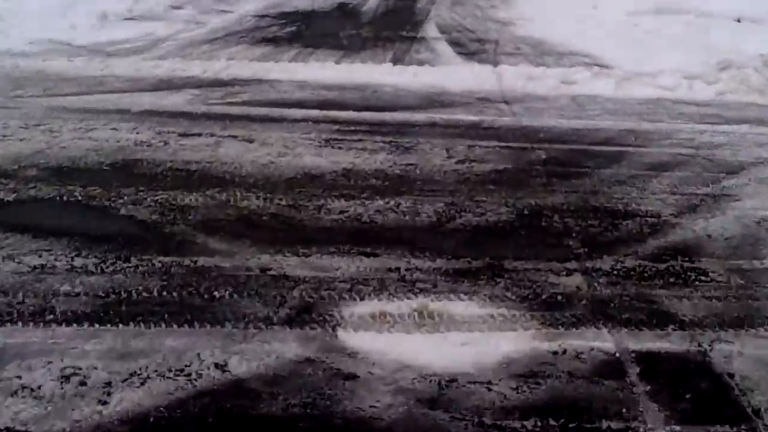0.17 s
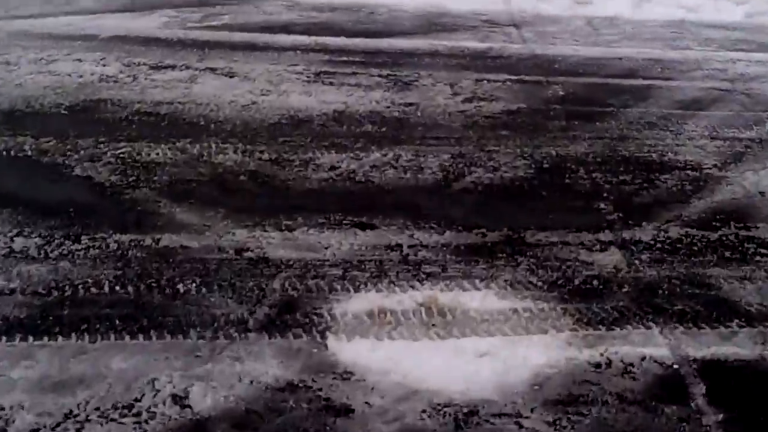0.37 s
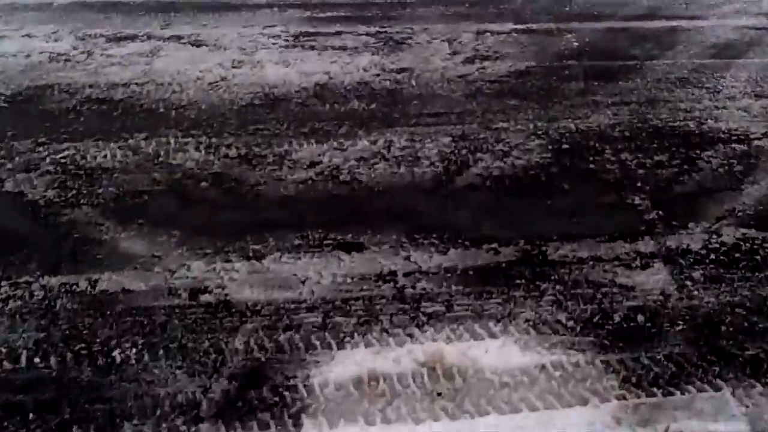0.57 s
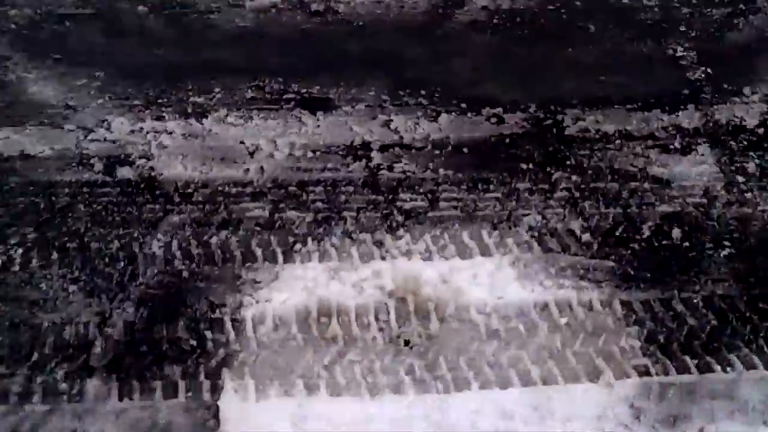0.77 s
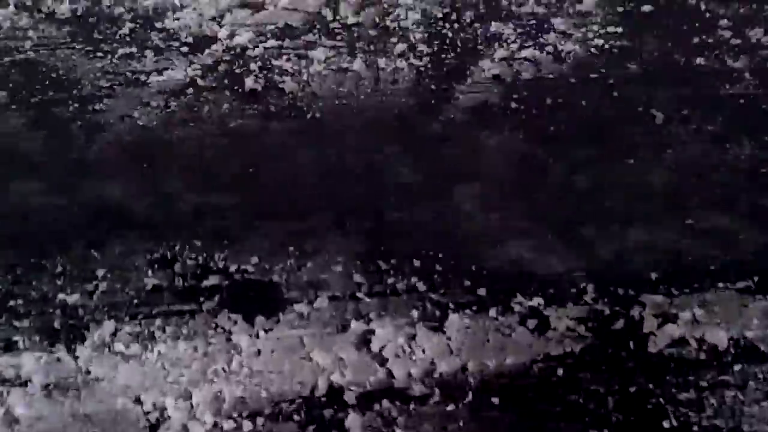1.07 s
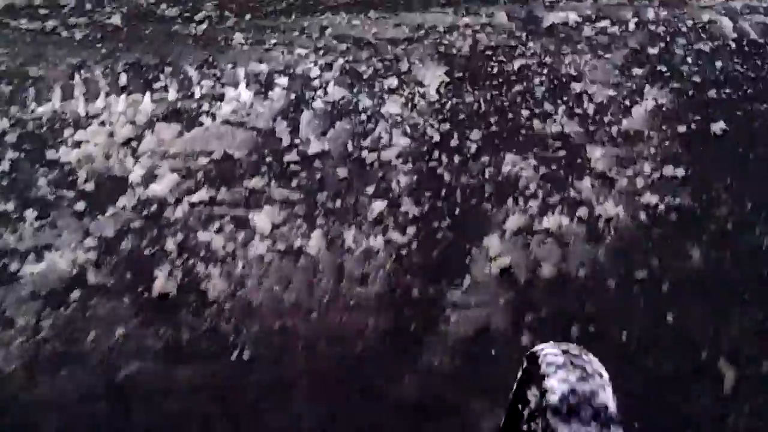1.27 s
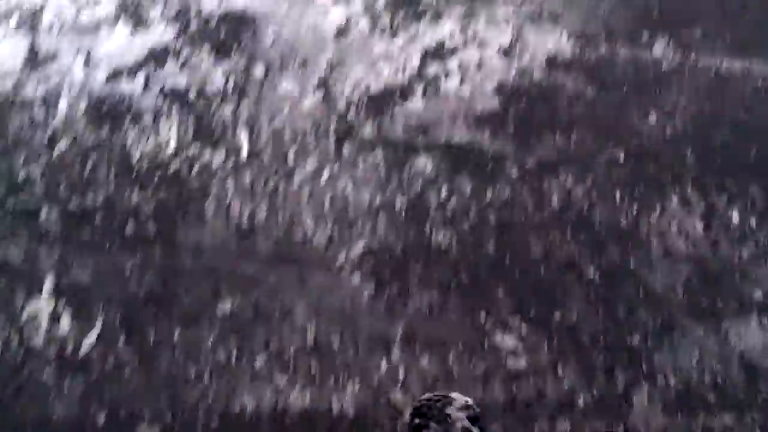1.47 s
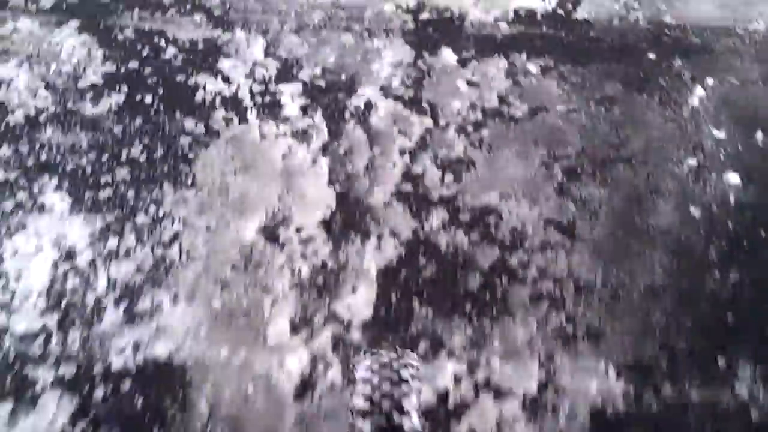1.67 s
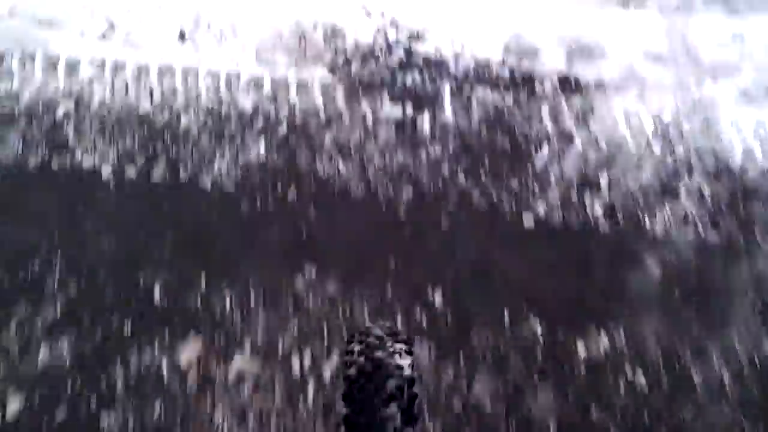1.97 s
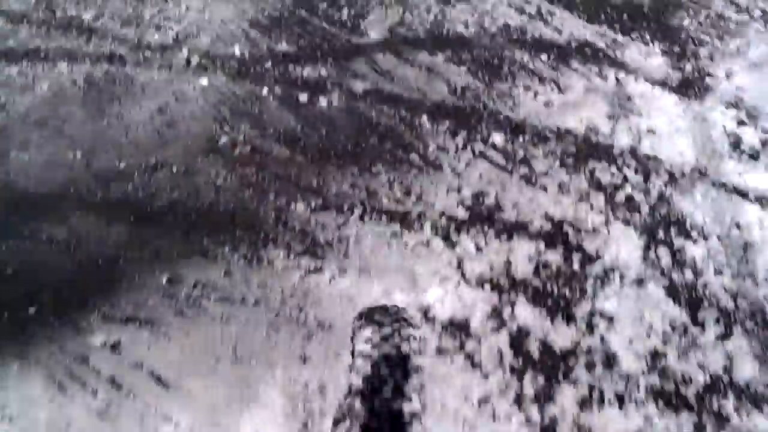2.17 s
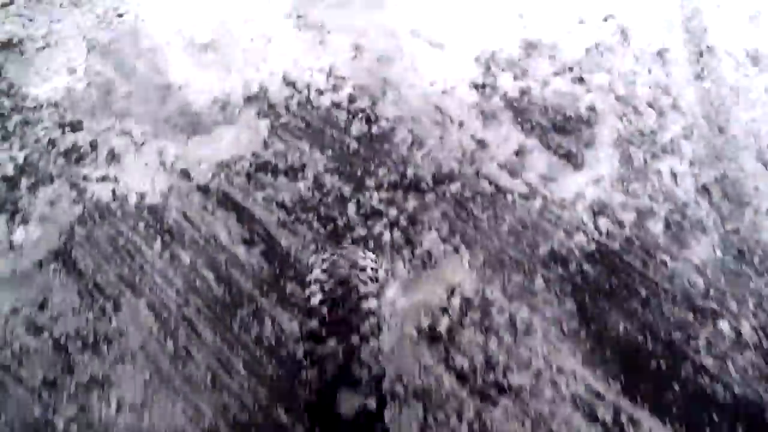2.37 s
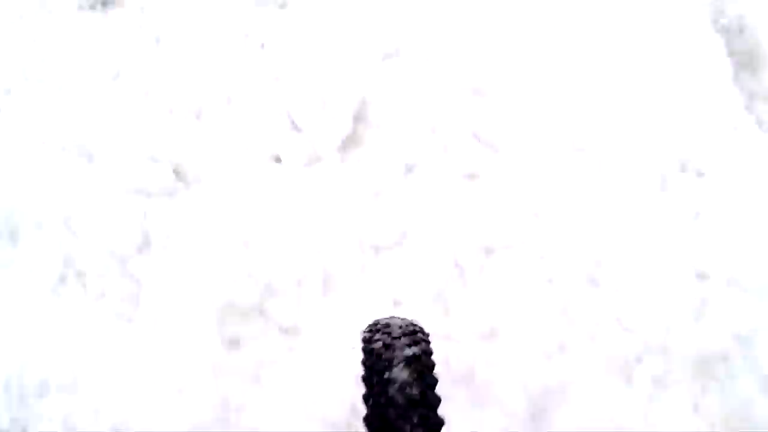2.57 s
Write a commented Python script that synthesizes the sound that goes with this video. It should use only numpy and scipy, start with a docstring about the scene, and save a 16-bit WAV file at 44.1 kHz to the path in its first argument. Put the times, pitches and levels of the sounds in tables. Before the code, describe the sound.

Continuous crunching of a bicycle tyre on ice and soft snow, close up, while wind rumbles on the microphone. Crisp cracks, dull bumps and small wet spits come first, then a low tread hum and a louder cluster of icy snaps.

```python
"""First comes a low rumble of wind and the crunch of ice under a knobbly bicycle tyre, heard from
the handlebar. Wind buffets the microphone while the tread breaks ice grains, squashes soft snow
and crushes dry powder over a faint wet-road hiss. Crust snaps, frozen lumps crumble, soft clods
give way, ruts bump the wheel and wet patches spit. Later the tread hums louder on bare road,
and a flurry of snaps ends the ride."""
import sys
import numpy as np
from scipy import signal
from scipy.fft import rfft, irfft
from scipy.io import wavfile

SR = 44100
rng = np.random.default_rng(int(sys.argv[2]) if len(sys.argv) > 2 else 0)


def wav_record(signal):
    """Record a signal, one row per channel, as 16-bit PCM in the file named by sys.argv[1]."""
    frames = np.transpose(np.atleast_2d(signal))
    bounded = np.clip(frames, -1, 1)
    # unit amplitude maps onto the largest positive 16-bit level
    quanta = np.round(bounded * 32767).astype(np.int16)
    wavfile.write(sys.argv[1], SR, quanta)


N = 119511  # samples: about 2.7 seconds


def amp(db):
    """Turns decibels into a number to multiply a sound by."""
    return 10 ** (np.asarray(db) / 20)


def unit(x):
    """Scales a sound so its average strength (rms) is 1."""
    return x / np.sqrt(np.mean(x ** 2) + 1e-20)


def level(points):
    """A volume curve that joins (time_s, level_db) points."""
    return amp(np.interp(np.arange(N) / SR, *np.transpose(points)))


def swells(rows):
    """A volume curve with one smooth hill per (middle_s, length_s, level_db) row."""
    t = np.arange(N) / SR
    power = sum(amp(db) ** 2 * np.exp(-np.pi * ((t - s) / length) ** 2) for s, length, db in rows)
    return np.sqrt(power + 1e-20)


def add(mix, start_s, sound):
    """Mixes a sound in at a given time."""
    part = mix[max(round(start_s * SR), 0):][:len(sound)]
    part += sound[:len(part)]


def ping(tone, stretch=1, sharpness=1, size=4096):
    """A click with a given tone. Stretch scales its pitch; sharpness 1 starts at once, 0 fades in."""
    pitch_hz, level_db = np.transpose(tone)
    hz = abs(np.fft.fftfreq(size, 1 / SR))
    log_gain = np.log(amp(np.interp(np.log(hz + 1), np.log(pitch_hz * stretch), level_db)))
    phase = -min(sharpness, 1) * signal.hilbert(log_gain).imag
    return np.fft.ifft(np.exp(log_gain + 1j * phase)).real


def through(x, pulse):
    """Gives a sound the tone of a pulse."""
    return signal.fftconvolve(x, pulse)[:N]


def drift(hz):
    """A smooth random wobble, up to about hz times a second."""
    keep_slow = np.exp(-(np.fft.rfftfreq(N, 1 / SR) / hz) ** 2)
    return unit(irfft(rfft(rng.standard_normal(N)) * keep_slow, N))


def grains(per_s, spread_db):
    """Random clicks. A positive spread makes a few louder, a negative one a few quieter."""
    size = amp(spread_db * np.minimum(rng.exponential(1, N), 4.5))
    return unit(size * rng.choice([-1, 1], N) * (rng.random(N) < per_s / SR))


def scatter(x, echo_db=-10.5, rise_s=.0014, fade_s=.018):
    """Adds a short blur of echoes from the tyre, frame and road."""
    t = np.arange(4096) / SR
    tail = rng.standard_normal(len(t)) * amp(-60 * t / fade_s) * (1 - np.exp(-t / rise_s))
    return x + amp(echo_db) * signal.fftconvolve(x, tail / np.linalg.norm(tail))[:len(x)]


# The wind's tone (how strong each pitch is next to the others): pitch_hz, level_db
WIND_TONE = [(5, -5), (20, 1.5), (40, 2.5), (85, -2.5), (140, -5.5), (220, -16), (400, -33), (1000, -57)]
# How loud the wind is: time_s, level_db
WIND_LEVEL = [(0, -37), (.08, -50), (.135, -47), (.18, -46), (.24, -40), (.32, -53), (.42, -41.5),
              (.52, -52), (.68, -43), (.8, -52), (.87, -44), (1.1, -40), (1.18, -37), (1.33, -35),
              (1.53, -38.5), (1.63, -48.5), (1.9, -49.5), (2.03, -44.5), (2.15, -54.5), (2.5, -48.5),
              (2.71, -75)]
def wind():
    """Swirling air buffets the microphone in quick, low gusts."""
    gusts = amp(2 * drift(hz=14))
    return unit(through(rng.standard_normal(N) * gusts, ping(WIND_TONE))) * level(WIND_LEVEL)


# The tone of cracking ice, shared by chips, snaps and crumbles: pitch_hz, level_db
ICE_TONE = [(30, -57), (140, -11), (300, -19.5), (1050, -3.5), (1650, -14), (2200, -8.5), (2900, 2.5),
            (3800, 2.5), (4500, -7.5), (5600, -15), (6800, -37.5), (10000, -32), (16000, -39)]
ICE_PITCH_HZ = 3257  # its pitch before stretching
# The tone of the fine grains: pitch_hz, level_db
CRUNCH_TONE = [(60, -36), (300, -27.5), (1100, -4.5), (1700, -17.5), (2300, -5), (3000, 0), (4000, 5.5),
               (4600, -14.5), (5500, -9), (6800, -26), (8300, -25.5), (10000, -25.5), (12000, -22.5),
               (16000, -37)]
# How loud the crunch is: time_s, level_db
CRUNCH_LEVEL = [(0, -42), (.1, -42.5), (.3, -42), (.43, -44.5), (.51, -40.5), (.59, -49), (.7, -43.5),
                (.8, -47.5), (.86, -53), (.98, -42.5), (1.1, -49.5), (1.25, -43), (1.4, -49), (1.5, -40.5),
                (1.58, -48), (1.7, -45), (1.83, -41), (1.95, -45.5), (2.05, -42.5), (2.23, -48),
                (2.3, -42.5), (2.345, -45), (2.44, -41), (2.505, -42), (2.6, -37.5), (2.71, -44.5)]
def crunch(sizes=5, chip_db=-18):
    """Ice grains of several sizes break in clumps, with a few larger chips."""
    fine, chips = np.zeros((2, N))
    for stretch in np.linspace(.89, 1.11, sizes):  # each size has its own pitch
        clicks = grains(per_s=3500 / sizes, spread_db=3.5) * amp(1.5 * drift(hz=35))
        fine += through(scatter(clicks), ping(CRUNCH_TONE, stretch))
        chip_clicks = grains(per_s=240 / sizes, spread_db=.5)
        chips += through(scatter(chip_clicks), ping(ICE_TONE, stretch))
    clumps = amp(2 * drift(hz=70))
    return (unit(fine * clumps) + amp(chip_db) * unit(chips)) * level(CRUNCH_LEVEL)


# The tone of soft snow: pitch_hz, level_db
SQUASH_TONE = [(40, 6.5), (130, 1.5), (270, 4.5), (400, 0.5), (700, 1.5), (1100, -4), (1700, -11.5),
               (3000, -15.5), (7000, -25.5), (16000, -40.5)]
# How loud the squashing is: time_s, level_db
SQUASH_LEVEL = [(0, -46.5), (.13, -47.5), (.17, -47.5), (.32, -47.5), (.42, -38.5), (.6, -45.5), (.75, -47),
                (.805, -41.5), (.84, -51), (1.08, -48), (1.24, -44), (1.42, -47.5), (1.48, -42),
                (1.57, -48), (2.05, -50.5), (2.25, -52.5), (2.6, -51.5), (2.71, -43)]
def squash():
    """Soft snow packs down in many small, dull slips."""
    slips = grains(per_s=1800, spread_db=2) * amp(2.55 * drift(hz=60.5))
    return unit(through(slips, ping(SQUASH_TONE))) * level(SQUASH_LEVEL)


# The tone of dry powder: pitch_hz, level_db
POWDER_TONE = [(200, -14), (1400, -0.5), (2400, -19), (3800, 2), (5100, 5), (6200, -6.5), (7500, -9.5),
               (16000, -45)]
# How loud the powder is: time_s, level_db
POWDER_LEVEL = [(0, -51), (.18, -49.5), (.4, -52.5), (.51, -50), (.6, -60.5), (1.3, -56.5), (1.5, -59.5),
                (1.88, -53), (2.25, -53.5), (2.55, -52.5), (2.71, -51.5)]
def powder():
    """Tiny dry crystals crush under the tread with a bright fizz."""
    crystals = grains(per_s=2700, spread_db=4.5)
    return unit(through(crystals, ping(POWDER_TONE))) * level(POWDER_LEVEL)


# How loud the tread's note is: time_s, level_db
HUM_LEVEL = [(0, -65), (1.5, -57), (1.68, -48), (1.9, -54), (2.04, -44.5), (2.3, -57), (2.71, -69)]
# The tone of the hollow tyre: pitch_hz, level_db
TYRE_TONE = [(30, -11.5), (110, -10), (150, -4.5), (200, -12.5), (275, -1.5), (370, -13.5), (700, -12),
             (1500, -21.5), (16000, -53)]
# How loud the hollow tyre is: time_s, level_db
TYRE_LEVEL = [(0, -61), (.7, -54.5), (1.7, -63), (2.05, -48), (2.25, -53), (2.45, -51), (2.71, -46.5)]
def hum(pitch_hz=51.93, wander=.049):
    """The knobs of the tread drum on the road and stir the hollow tyre."""
    cycles = np.cumsum(pitch_hz * (1 + wander * drift(hz=11))) / SR
    note = unit(np.sin(2 * np.pi * cycles))
    hollow = unit(through(grains(per_s=1100, spread_db=-1), ping(TYRE_TONE)))
    return note * level(HUM_LEVEL) + hollow * level(TYRE_LEVEL)


# The tone of the wet road: pitch_hz, level_db
HISS_TONE = [(1000, -12), (7000, -5.5), (10000, 1.5), (12500, -6), (16000, 0)]
def hiss(level_db=-63.5):
    """The wet road gives a faint, steady hiss."""
    return amp(level_db) * unit(through(rng.standard_normal(N), ping(HISS_TONE)))


# Single snaps of ice crust: time_s, level_db (before the boost), pitch_hz
SNAPS = [(.043, -15, 3520), (.1057, -17, 3120), (.1171, -21.5, 3280), (.192, -19, 3580), (.1976, -25, 3480),
         (.2480, -23, 3430), (.251, -18.5, 2820), (.2772, -17, 3700), (.3086, -33, 3500),
         (.3119, -30, 3900), (.3548, -27.5, 2280), (0.3822, -25, 2000), (0.7936, -26.5, 3340),
         (.8088, -22.5, 3370), (.886, -24, 3240), (.925, -25.5, 3100), (.963, -19.5, 3300),
         (1.0373, -21.5, 3100), (1.4170, -29.5, 2630), (1.6035, -29, 3380), (1.8242, -23, 3670),
         (1.8544, -22.5, 3460), (1.8828, -23.5, 3230), (2.1471, -22.5, 3020), (2.3108, -18.5, 2450),
         (2.3167, -8.5, 3230), (2.3664, -23, 3200), (2.3815, -24, 3050), (2.3922, -20, 3100),
         (2.457, -21, 3500), (2.5359, -14, 3020), (2.5415, -21, 3420), (2.5507, -16.5, 3500),
         (2.5740, -15, 2710), (2.5786, -19, 2980), (2.5824, -8.5, 3150), (2.5981, -14.5, 3230),
         (2.605, -20, 3300), (2.6114, -16, 3250), (2.6162, -19, 3530), (2.6488, -20, 3140),
         (2.7018, -21, 3240)]
def snaps(boost_db=.85, splinter_db=-6.5, splinter_s=.0005):
    """Each piece of crust breaks with a click and splinters again right after."""
    out = np.zeros(N)
    for time_s, level_db, pitch_hz in SNAPS:
        click = ping(ICE_TONE, pitch_hz / ICE_PITCH_HZ, sharpness=.2)
        click = np.fft.fftshift(click) / abs(click).max()  # move the peak to the middle
        delay = round(splinter_s * (.5 + rng.random()) * SR)
        splinter = amp(splinter_db) * np.roll(click, delay)
        add(out, time_s - len(click) / 2 / SR, amp(level_db + boost_db) * scatter(click + splinter))
    return out


# Lumps of frozen snow crumbling: middle_s, length_s, level_db, pitch_hz
CRUMBLES = [(0.086, 0.017, -38.5, 3400), (0.126, 0.02, -35.5, 3400), (0.176, 0.01, -37, 4160),
            (0.199, 0.013, -35.5, 3250), (.253, 0.0059, -31.5, 3200), (0.308, 0.005, -33, 3440),
            (0.347, 0.0082, -41, 2820), (0.384, 0.017, -38, 2660), (0.8, .072, -48, 3340),
            (0.882, 0.011, -48, 3060), (0.965, 0.016, -41.5, 3300), (1.036, .026, -37, 3250),
            (1.206, 0.032, -41, 3100), (1.304, 0.0089, -39, 2970), (1.338, 0.011, -39.5, 3600),
            (1.535, 0.024, -39, 3200), (1.63, 0.018, -38, 3300), (1.857, 0.0087, -40, 3070),
            (2.387, 0.024, -38, 3030), (2.535, 0.009, -36, 2980), (2.573, .011, -33, 3100),
            (2.661, .008, -34, 3160)]
def crumbles():
    """Each frozen lump collapses in a burst of small cracks at its own pitch."""
    out = np.zeros(N)
    cracks = grains(per_s=3500, spread_db=1.5)
    for *burst, pitch_hz in CRUMBLES:
        out += unit(through(cracks, ping(ICE_TONE, pitch_hz / ICE_PITCH_HZ))) * swells([burst])
    return out


# Soft clods collapsing: middle_s, length_s, level_db
CLODS = [(.126, 0.0087, -39.5), (.354, 0.014, -44), (.381, 0.011, -41), (.505, 0.087, -43.5),
         (.571, 0.016, -38.5), (.597, 0.043, -44), (.722, 0.013, -45.5), (1.036, 0.01, -36),
         (1.195, .013, -39), (1.303, 0.02, -43.5), (1.387, 0.0053, -37), (1.668, 0.006, -44),
         (2.6, 0.0048, -34.5)]
# The tone of a clod: pitch_hz, level_db
CLOD_TONE = [(60, -34.5), (250, 5), (600, -0.5), (1100, 2), (1400, -4.5), (1800, -10.5), (2600, -11.5),
             (4000, -21), (7000, -25), (16000, -44)]
def clods():
    """Clods of packed snow give way under the tyre with a dull scrunch."""
    return unit(through(grains(per_s=4000, spread_db=-1.5), ping(CLOD_TONE))) * swells(CLODS)


# The wheel hitting ruts: start_s, pitch_hz, level_db
BUMPS = [(.131, 40.2, -32), (0.565, 200, -33), (.575, 245, -24.5), (0.775, 224, -28), (0.796, 267, -24),
         (0.809, 240, -31), (0.994, 68, -24.5), (1.0324, 130, -19.5), (1.192, 131, -31), (1.339, 75, -31),
         (1.415, 55, -26.5), (1.488, 118, -26), (2.033, 38.4, -32)]
def bumps(rise_cycles=.28):
    """Each rut pushes the tyre, making a thud that dies almost at once."""
    out, t = np.zeros(N), np.arange(SR // 8) / SR
    for start_s, pitch_hz, level_db in BUMPS:
        age = t * pitch_hz / rise_cycles  # 1 when the push is strongest
        push = age ** 2 * np.exp(2 * (1 - age))
        add(out, start_s, amp(level_db) * push * np.sin(2 * np.pi * pitch_hz * t))
    return out


# Wet patches spitting: middle_s, length_s, level_db
SPITS = [(.7245, 0.0074, -44), (1.039, 0.024, -48), (1.19, .017, -51), (1.23, .04, -57),
         (1.342, 0.014, -55), (1.385, .006, -56), (1.5, .09, -56.5), (1.518, 0.0025, -47),
         (1.63, 0.016, -54.5), (1.745, .021, -50), (2.58, .012, -53), (2.6163, .002, -48)]
# The tone of the spray: pitch_hz, level_db
SPIT_TONE = [(200, -18), (2000, -17), (5000, 3), (7500, 0.5), (10300, 3.5), (12000, -2.5), (16000, -10.5)]
def spits():
    """Water squeezed from the slush bursts into fine, bright droplets."""
    droplets = grains(per_s=4000, spread_db=3.6)
    return unit(through(droplets, ping(SPIT_TONE))) * swells(SPITS)


def scene():
    """Adds all the sounds together in one channel."""
    rolling = wind() + crunch() + squash() + powder() + hum() + hiss()
    return (rolling + snaps() + crumbles() + clods() + bumps() + spits())[None]


def record(dry):
    """Cuts away the very highest treble."""
    cutoff_hz = 15500
    treble_cut = signal.firwin(401, cutoff_hz, window=("kaiser", 9), fs=SR)
    return signal.oaconvolve(dry, treble_cut[None], "same")


dry = scene()
out = record(dry)
wav_record(out)
```